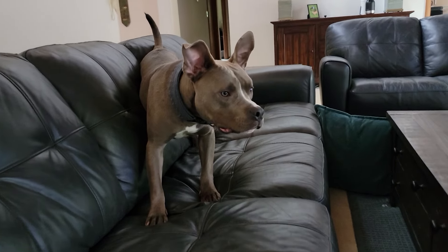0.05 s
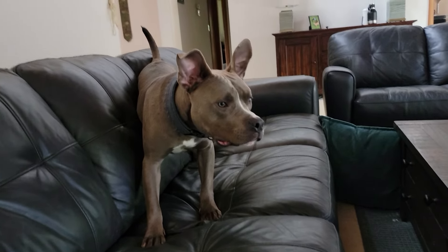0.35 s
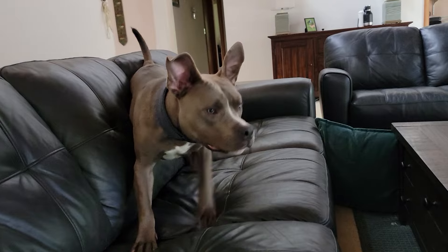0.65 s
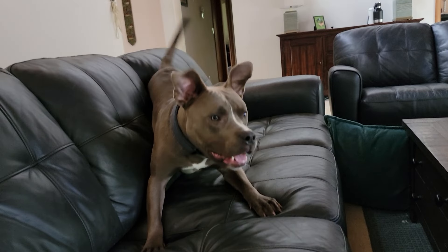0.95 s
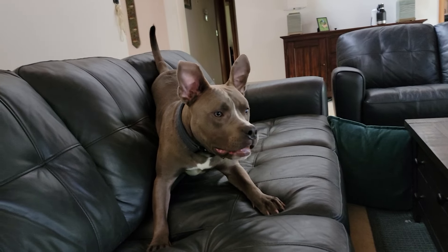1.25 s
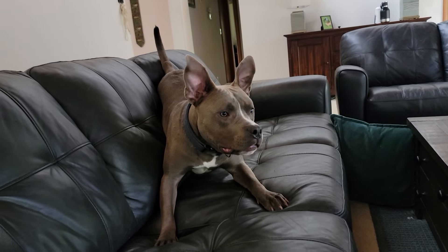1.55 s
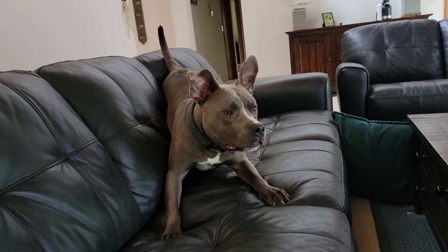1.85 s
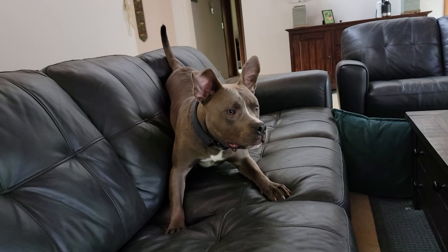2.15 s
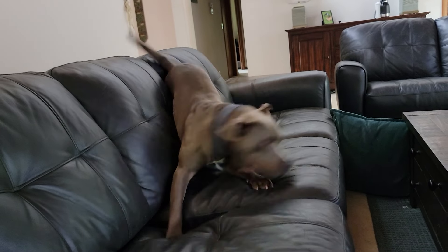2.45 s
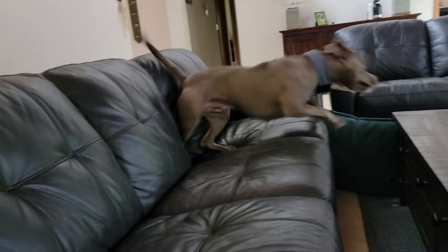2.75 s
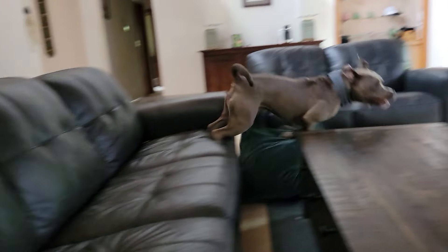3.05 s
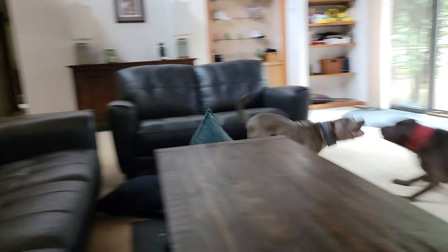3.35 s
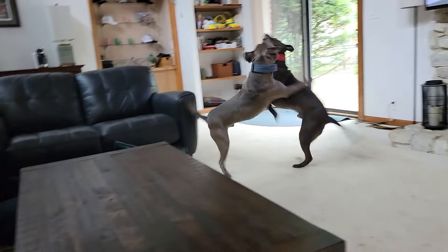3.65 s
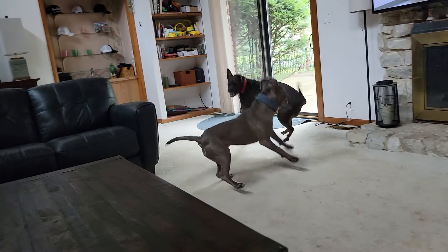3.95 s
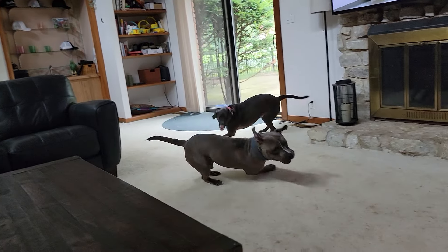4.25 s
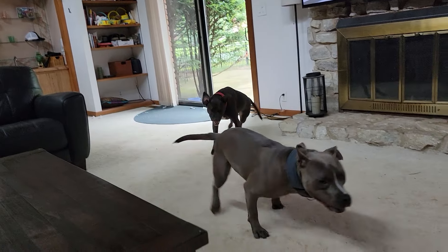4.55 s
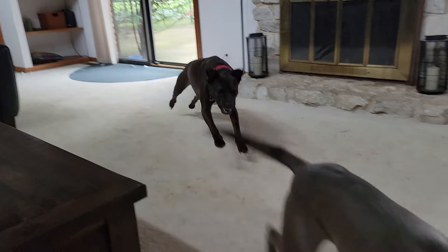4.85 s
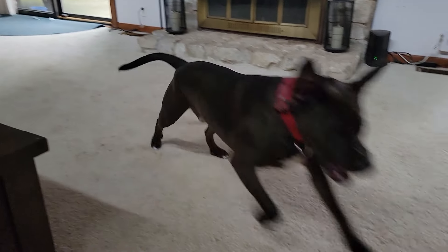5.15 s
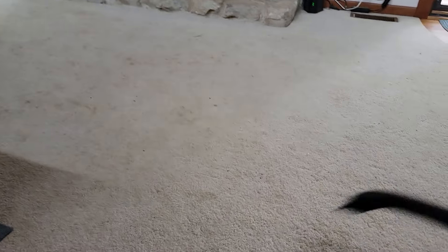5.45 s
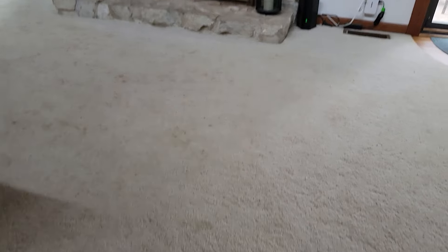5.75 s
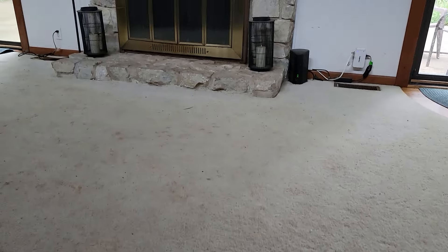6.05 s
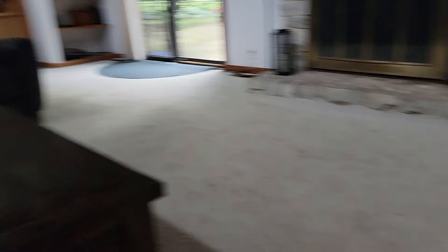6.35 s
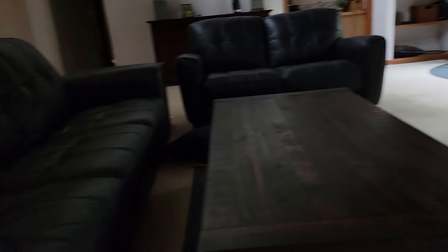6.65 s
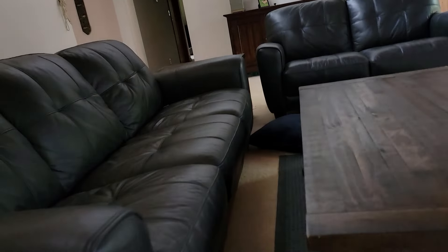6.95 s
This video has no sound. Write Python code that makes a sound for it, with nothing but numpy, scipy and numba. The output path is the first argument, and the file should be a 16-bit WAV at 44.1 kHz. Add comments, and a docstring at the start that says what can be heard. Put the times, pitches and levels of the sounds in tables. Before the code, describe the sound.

Paws thump on a leather sofa, then loud, rough barks and growls break out as two dogs tussle and run across carpet.

```python
"""Rough barks, growls and thudding paws: two dogs play-fight in a carpeted living room.
One thumps a leather sofa, then leaps off with a bark; they tussle, one yelps, and they run past.
Each call is vocal-fold pulses and breath ringing jaw, tongue and throat. Paws set floor and cushions
swinging, leather and carpet rustle, claws click and a collar chinks. The room rings briefly over a
low hum, all heard through a phone with a microphone at each end."""
import sys
import numpy as np
from scipy import signal
from scipy.fft import rfft, irfft
from scipy.io import wavfile
from scipy.ndimage import uniform_filter1d, minimum_filter1d
from numba import njit

SR = 44100
rng = np.random.default_rng(int(sys.argv[2]) if len(sys.argv) > 2 else 0)


def wrap_up_sound(samples):
    """Save the sound to the file named by the first command line argument, as 16-bit audio."""
    columns = np.atleast_2d(samples).T
    # keep every value between -1 and 1, then stretch to whole-number steps
    tamed = np.clip(columns, -1, 1)
    steps = np.round(tamed * 32767).astype(np.int16)
    wavfile.write(sys.argv[1], SR, steps)


N = 308700
TIME = np.arange(N) / SR


def undb(db):
    """Decibels to gain."""
    return 10 ** (np.asarray(db) / 20)


def unit(x):
    """Scale to rms 1."""
    return x / np.sqrt(np.mean(x ** 2) + 1e-20)


def add(out, s, x):
    """Mix x into out from time s."""
    i = int(s * SR)
    out[..., i:i + x.shape[-1]] += x[..., :N - i]


def on_log_axis(points, hz):
    """Read (Hz, value) points at any frequency."""
    f, value = np.transpose(points)
    return np.interp(np.log(hz + 1), np.log(f), value)


def colour(x, points):
    """Equalise by a curve of (Hz, dB) points."""
    n = x.shape[-1]
    return irfft(rfft(x) * undb(on_log_axis(points, np.arange(n // 2 + 1) * SR / n)), n)


@njit
def svf(x, hz, width):
    """State-variable filter with moving centre: band-pass and low-pass."""
    band, low, b, l = np.empty(len(x)), np.empty(len(x)), 0., 0.
    for i in range(len(x)):
        g, k = np.tan(np.pi * hz[i] / SR), width[i] / hz[i]
        v = (b + g * (x[i] - l)) / (1 + g * (g + k))
        band[i], low[i] = k * v, l + g * v
        b, l = 2 * v - b, 2 * low[i] - l
    return band, low


def resonate(x, hz, width):
    """One resonance, gain 1 at its centre."""
    return svf(x, hz + 0 * x, width + 0 * x)[0]


def steep(x, hz, width):
    """A resonance with steep skirts."""
    return resonate(resonate(x, hz, width), hz, 2 * width)


def lowpass(x, hz):
    """Flat two-pole low-pass whose corner can move."""
    return svf(x, hz + 0 * x, np.sqrt(2) * hz + 0 * x)[1]


def butterworth(x, kind, hz, order):
    """Steady high-pass or low-pass."""
    return signal.sosfilt(signal.butter(order, hz, kind, fs=SR, output="sos"), x)


def walk(n, rate):
    """Random drift with spread near 1 and about rate turns a second."""
    knots = rng.standard_normal(8192)
    return np.interp(np.arange(n) * rate / SR, np.arange(8192), knots) * np.sqrt(3 / 2)


def diffuse(n, mic_gap_m=.15):
    """Noise from all sides at the two microphones: alike in the bass, unrelated in the treble."""
    likeness = np.sinc(2 * np.arange(n // 2 + 1) * SR / n * mic_gap_m / 343)
    mid, side = rfft(rng.standard_normal((2, n))) * np.sqrt([1 + likeness, 1 - likeness])
    return irfft(np.array([mid + side, mid - side]), n) / np.sqrt(2)


def room(x, build_s=0.0072):
    """Reverb that builds over the first reflections, each octave dying at its own rate."""
    # The room's decay. Each row: frequency in Hz, seconds to fall 60 dB.
    decay_times = [(100, 0.38), (550, 0.74), (1200, 0.63), (15000, 0.59)]
    t = TIME[:SR * 4 // 5]
    field = rfft(diffuse(len(t)))
    octave = np.log2(np.maximum(np.arange(len(t) // 2 + 1) * SR / len(t), 64) / 64)
    tail = 0
    for k in range(10):
        t60 = on_log_axis(decay_times, 64 * 2 ** k)
        fade = undb(-60 * t / t60) * (1 - np.exp(-(t / build_s) ** 2))
        band = irfft(field * np.maximum(1 - abs(octave - k), 0), len(t))
        tail = tail + band * fade / np.linalg.norm(fade)
    return signal.fftconvolve(x[None], tail, axes=1)[:, :N]


def house_hum(level_db=-62, waver_db=1.0):
    """The low hum of the house: a bed of dark, gently wavering noise."""
    # The hum's tone. Each row: frequency in Hz, gain in dB.
    spectrum = [(20, -27), (79, -12), (150, -21.5), (172, -27), (228, -23.5), (357, -39.5), (1150, -44.5),
                (1710, -61.5), (3530, -43.5), (16000, -104)]
    return unit(colour(diffuse(N), spectrum)) * undb(level_db + waver_db * walk(N, 4.2))


def scratches(per_s=35, scatter_db=5, grain_s=0.0052, centre_hz=8000, level_db=-11):
    """Claws catch in leather and carpet pile: sparse crisp ticks of uneven size."""
    catches = (rng.random(N) < per_s / SR) * undb(scatter_db * rng.standard_normal(N))
    grains = signal.lfilter([1], [1, -np.exp(-1 / (grain_s * SR))], catches)
    ticks = np.array([resonate(mic * grains, centre_hz, centre_hz) for mic in diffuse(N)])
    return undb(level_db) * unit(ticks)


def scuffle(rise_s=0.086, settle_s=0.085, fidget_db=-80, rustle_db=1, grain_db=1.5, slip_db=2.0,
            patter_db=2.5, pan_db=-2):
    """Leather and carpet rustle in little slips as the dogs' weight rumbles through sofa and floor."""
    # Bouts of pouncing, wrestling and running.
    # Each row: start in seconds, length in seconds, rustle in dB, rumble in dB.
    bouts = [(0.716, 0.034, -39.5, -34), (2.378, 0.36, -44, -41), (2.818, 0.15, -48, -38.5),
             (3.009, 0.019, -41.5, -32.5), (3.322, 0.098, -42.5, -31), (3.45, 0.63, -38.5, -41.5),
             (4.267, 0.53, -49, -46), (4.889, 0.46, -52.5, -38), (5.252, 0.59, -46, -34.5),
             (6.02, 0.14, -45.5, -34), (6.348, 0.43, -59.5, -46.5)]
    # The tone of the rustle and of the rumble. Each row: frequency in Hz, gain in dB.
    rustle_eq = [(300, -1), (900, 18), (2500, 11), (4200, 5.5), (7300, 5.5), (8300, -5.5), (16000, 1)]
    rumble_eq = [(20, -20), (65, 3.5), (150, -1), (330, -10), (2000, -39)]
    rubbing, weight = np.full(N, undb(fidget_db)), np.zeros(N)
    for s, length, rub_db, weight_db in bouts:
        rise = np.clip(1 + (TIME - s) / rise_s, 0, 1) ** 2
        effort = rise * np.exp(-np.maximum(TIME - s - length, 0) / settle_s)
        rubbing = np.maximum(rubbing, undb(rub_db) * effort)
        weight = np.maximum(weight, undb(weight_db) * effort)
    slips = unit(undb(grain_db * walk(N, 500) + slip_db * walk(N, 35)))
    mic_gains = undb(rustle_db + np.array([[pan_db], [-pan_db]]) / 2)
    rustle = unit(colour(diffuse(N) * slips, rustle_eq)) * mic_gains
    rumble = unit(colour(diffuse(N) * undb(patter_db * walk(N, 30)), rumble_eq))
    return (rustle + scratches()) * rubbing + rumble * weight


def swishes(flutter_db=3, room_db=-4):
    """Snorts, sliding paws and two collar jingles: short fluttering swells of hiss."""
    # Each row: crest in seconds, half length in seconds, level in dB, centre in Hz, width in Hz.
    swells = [(0.774, 0.05, -47, 200, 1200), (2.375, 0.014, -31.5, 663, 700),
              (0.743, .035, -48, 14260, 5400), (2.723, 0.029, -47, 11020, 9936),
              (3.047, 0.022, -36.5, 4722, 4860), (3.013, 0.022, -39, 375, 277.8),
              (4.52, 0.021, -44.5, 2800, 1389), (4.921, 0.052, -46.5, 1306, 2650),
              (6.16, 0.16, -45, 1170, 2800), (6.398, 0.047, -49, 3860, 2160),
              (6.74, 0.035, -46.5, 4150, 648)]
    out = np.zeros(N)
    for s, half, db, hz, width in swells:
        t = np.arange(-2 * half, 2 * half, 1 / SR)
        hiss = unit(steep(rng.standard_normal(N)[:len(t)], hz, width))
        add(out, s + t[0], hiss * np.exp(-(t / half) ** 2) * undb(db + flutter_db * walk(len(t), 216.2)))
    return out + undb(room_db) * room(out)


def collar(ring_t60=0.057, ring_width_hz=420, ring_db=-4, crack_db=-2, crack_s=0.0031, crack_hz=4800,
           room_db=-9):
    """A collar ring chatters on its buckle: a sharp crack and damped metal modes, never twice alike."""
    # The metal ring's modes. Each row: frequency in Hz, gain in dB.
    modes = [(4210, 8), (6400, -0.5), (9040, -12), (10300, -21)]
    # Its chinks. Each row: start in seconds, strength in dB.
    chinks = [(4.316, -34.5), (4.691, -31.5), (4.742, -39), (4.991, -31.5), (5.159, -35), (6.37, -37.5),
              (6.697, -43), (6.718, -37.5)]
    rings, cracks, t = np.zeros(N), np.zeros(N), TIME[:SR // 4]
    for s, db in chinks:
        chatter = rng.standard_normal(2 * len(t))
        scatter_db = 2 * rng.standard_normal(len(modes))
        metal = sum(undb(gain + scatter) * steep(chatter, hz, ring_width_hz)
                    for (hz, gain), scatter in zip(modes, scatter_db))
        ring = unit(metal)[len(t):]  # already ringing at full strength
        crack = unit(resonate(chatter[:len(t)], crack_hz, 2 * crack_hz))
        add(rings, s, undb(db + ring_db) * ring * undb(-60 * t / ring_t60))
        add(cracks, s, undb(db + crack_db) * crack * np.exp(-t / crack_s))
    return rings + cracks + undb(room_db) * room(rings)


def clicks(crack_db=-1, crack_s=0.0048, trim_db=-7, room_db=-19):
    """Claws and teeth make small hard contacts close by: a broad crack and one short resonance."""
    # Each row: start in seconds, level in dB before the trim, ring in Hz, seconds to fall 60 dB.
    contacts = [(0.102, -46, 1100, 0.016), (0.103, -31, 380, 0.043), (0.661, -40, 3740, 0.072),
                (0.727, -23, 1270, 0.023), (0.9983, -22, 4570, 0.0039), (0.9984, -30.5, 900, 0.0062),
                (3.45, -24.5, 6100, 0.063), (3.587, -23, 11500, 0.027), (4.094, -26.5, 5950, 0.023),
                (4.924, -30.5, 1070, 0.062), (5.225, -26.5, 6560, 0.0055)]
    out, t = np.zeros(N), TIME[:SR // 3]
    for s, db, hz, t60 in contacts:
        noise = rng.standard_normal(len(t))
        crack = undb(crack_db) * unit(resonate(noise, hz, 2 * hz)) * np.exp(-t / crack_s)
        ring = unit(resonate(noise, hz, hz / 10))
        add(out, s, undb(db + trim_db) * (ring + crack) * undb(-60 * t / t60))
    return out + undb(room_db) * room(out)


def thumps(contact_s=0.0035, ring_cycles=17, thud_db=-5, sag=0.11, room_db=-7):
    """A soft paw sets floor or cushion swinging, lower as the load eases, with a dull thud on top; one short
    low growl is made the same way."""
    # Paw landings and knocks, and at 4.2 s a short low growl. Each row: start in seconds, level in dB, ring in
    # Hz.
    landings = [(0.694, -33.5, 99), (0.755, -24.5, 152), (0.804, -25.5, 114), (2.347, -22.5, 105),
                (2.722, -22, 118), (2.997, -20.5, 268), (3.026, -28, 135), (3.254, -28.5, 96.5),
                (3.288, -28, 182), (4.023, -20, 100), (4.205, -18.5, 244), (4.674, -29, 78),
                (4.972, -28.5, 76), (5.171, -31.5, 98), (5.646, -11.5, 122), (5.916, -17, 103),
                (6.014, -24, 141), (6.486, -34, 112), (6.614, -35, 280), (6.911, -36, 100),
                (6.956, -33.5, 100)]
    out, t = np.zeros(N), TIME[:SR // 2]
    for s, db, hz in landings:
        thud = unit(lowpass(resonate(rng.standard_normal(len(t)), hz, 2 * hz), 5 * hz))
        attack = 1 - np.exp(-t / contact_s)
        fade = undb(-60 * t * hz / ring_cycles)
        swing = np.sin(2 * np.pi * np.cumsum(hz * (1 + sag * (2 * fade - 1))) / SR)
        add(out, s, undb(db) * attack * fade * (swing + undb(thud_db) * thud))
    out = butterworth(out, "high", 62, order=3)
    return out + undb(room_db) * room(out)


def voice(pitch, db, rough, jaw_hz, corner_hz, hiss_db, tongue_hz, whistle_hz, nose_db=-60,
          jitter=.06, shimmer_db=3, flutter_db=2.0, throat_db=2, tongue_db=-4, spray_db=-10):
    """Uneven vocal-fold pulses and breath ring jaw, tongue, throat and nose; air whistles past teeth."""
    # Resonances of the throat and of the teeth. Each row: centre in Hz, width in Hz, gain in dB.
    throat = [(1200, 28, -23), (1310, 344, -2.5), (1430, 154, -12), (1754, 110, -0.5), (2120, 284, -7.5)]
    teeth = [(6660, 1500, 9), (6980, 2000, 6.4)]
    n, rough = len(pitch), np.clip(rough, 0, 1)
    cycles = np.cumsum(pitch * (1 + jitter * rough * walk(n, 260))) / SR
    pulses = unit(np.diff(np.floor(cycles), prepend=0) * undb(shimmer_db * rough * walk(n, 254.5)))
    air = unit(np.exp(-(cycles % 1) / 2.0) * rng.standard_normal(SR)[:n])  # one puff a cycle
    flutter = undb(flutter_db * rough * walk(n, 220))  # lips and folds flap
    folds = pulses * np.sqrt(1 - rough)
    low_drive = (folds + 1.5 * rough * air) * flutter
    high_rough = np.sqrt(rough) * (1 + rough) / 2  # the upper partials break up first
    high_drive = (np.sqrt(np.maximum(1 - high_rough, 0)) * pulses + np.sqrt(high_rough) * air) * flutter

    upper = sum(undb(gain) * steep(high_drive, hz, width) for hz, width, gain in throat)
    upper += undb(tongue_db) * steep(high_drive, tongue_hz, width=220)
    upper = lowpass(lowpass(upper, corner_hz), corner_hz)  # a closing mouth muffles the throat
    upper = butterworth(upper, "low", 2900, order=8)
    chest = undb(-32 - 0.85 * db) * steep(folds, pitch, width=100)  # the fundamental shows in soft calls
    nose = undb(nose_db) * steep(high_drive, hz=2090, width=640)
    jaw = steep(low_drive, jaw_hz, width=180 * (1 + rough))
    tone = jaw + undb(throat_db) * upper + chest + nose
    tone = tone / np.sqrt(uniform_filter1d(tone ** 2, size=1100) + 1e-12)  # levelled over 25 ms

    hiss = unit(sum(undb(gain) * steep(high_drive, hz, width) for hz, width, gain in teeth))
    hiss = butterworth(hiss, "high", 5000, order=4)
    whistle = unit(steep(air, whistle_hz * (1 + .04 * walk(n, 35)), width=270))
    spray = undb(spray_db) * unit(steep(air, hz=13000, width=6700))
    breath = (hiss + whistle) / np.sqrt(2) + spray
    return (tone + undb(hiss_db) * breath) * undb(db) * signal.windows.tukey(n, .06)


def yelp(quaver=.02):
    """A clean upward leap of pitch that roughens into a quavering whine. Gives start and sound."""
    # The yelp's path. Each row: time in seconds, pitch in Hz, level in dB, roughness from 0 to 1.
    contour = [(5.25, 201, -44, .2), (5.265, 265.7, -26, 0.1), (5.272, 305.7, -16, 0.14),
               (5.288, 350, -16, 0.06), (5.301, 395.3, -24, 0.25), (5.334, 427.8, -26.5, 0.35),
               (5.357, 378.2, -20.5, 0.2), (5.448, 354.8, -27.5, 0.17)]
    s, *columns = np.transpose(contour)
    pitch, db, rough = (np.interp(np.arange(s[0], s[-1], 1 / SR), s, c) for c in columns)
    pitch = pitch * (1 + quaver * walk(len(pitch), 40))
    return s[0], voice(pitch, db, rough, jaw_hz=591, corner_hz=1175, hiss_db=-39.5, tongue_hz=792,
                       whistle_hz=6900, nose_db=-13.5)


def bark(s, hold_s, db, pitch_hz, rough, jaw_hz, corner_hz, hiss_db, tongue_hz, whistle_hz,
         attack_s=.03, release_s=0.021, shut_db=-16.5, tire_db=-3.5, dull_octaves=0.67):
    """The mouth opens, holds while the push tires, and shuts. Gives start and sound."""
    t = np.arange(-attack_s, hold_s + release_s, 1 / SR)
    shut = np.interp(t, [-attack_s, 0, hold_s, hold_s + release_s], [1, 0, 0, 1])
    tired = np.clip(t / hold_s, 0, 1) - .5
    level = db + tire_db * tired + shut_db * shut ** 2
    pitch = pitch_hz * (1 - .03 * tired - .06 * shut)
    mouth = 1 - 0.18 * shut  # resonances sink as the mouth shuts
    corner = corner_hz / 2 ** (dull_octaves * shut)
    sound = voice(pitch, level, rough, jaw_hz * mouth, corner, hiss_db, tongue_hz * mouth,
                  whistle_hz * mouth)
    return s - attack_s, sound


def dog_calls(standing_db=2, standing_width_hz=7):
    """Each call reaches the microphones a little apart and rings the room and its standing waves."""
    # Barks and growls. Each row: time of full voice in seconds, hold in seconds, level in dB,
    # pitch in Hz, roughness from 0 to 1, jaw resonance in Hz, mouth brightness corner in Hz,
    # hiss between the teeth in dB, tongue resonance in Hz, whistle of the teeth in Hz.
    barks = [(2.418, .026, -9, 274.5, 0.16, 568, 2580, -27.5, 1953, 6240),
             (2.458, 0.043, -14, 285.9, 0.61, 634, 2430, -21.5, 1370, 6570),
             (2.494, 0.033, -12.5, 281.8, 0.22, 570, 1980, -17, 1190, 6430),
             (3.397, .015, -32.5, 203.6, 0.65, 610, 800, -16, 780, 6840),
             (3.431, 0.048, -21, 217.6, 0.73, 667, 1150, -20.5, 1134, 7000),
             (3.504, 0.065, -13, 263.4, 0.53, 760, 1570, -21, 1227, 7750),
             (3.591, 0.07, -21.5, 260.8, 0.7, 742, 1266, -19, 1030, 6020),
             (3.742, 0.08, -18, 295.2, 0.8, 746, 2420, -19.5, 1346, 5600),
             (3.883, 0.2, -28, 181.1, 0.37, 560, 1080, -17, 783, 6340),
             (4.115, 0.042, -27.5, 180.2, 0.37, 586, 1070, -31, 1480, 6130),
             (4.538, 0.011, -32.5, 274.2, 0.14, 540, 1120, -15, 866, 6000),
             (5.49, 0.077, -20, 259.5, 0.41, 544, 1510, -33, 1070, 6940),
             (5.554, 0.041, -8.5, 259.5, 0.41, 763, 3020, -31.5, 1133, 6630),
             (5.623, 0.028, -19.5, 254.9, 0.64, 608, 2126, -20.5, 1065, 6200),
             (5.994, 0.15, -37, 174.8, 0.57, 473, 660, -17, 600, 7050)]
    # Where the calling dog is. Each row: time in seconds, reverb send in dB,
    # lead of the left microphone in milliseconds (negative when the dog is on the right).
    places = [(2.5, -2.5, -0.44), (3.499, 0, -0.12), (3.8, -0.5, -0.17), (4.499, -2, 0), (5.28, -4, -.34),
              (5.597, -3.5, -0.3)]
    # The room's standing waves, in Hz.
    standing_hz = [1108, 1133, 1170, 1550]
    direct, send = np.zeros((2, N)), np.zeros(N)
    s, *columns = np.transpose(places)
    for start, sound in [bark(*row) for row in barks] + [yelp()]:
        room_db, lead_ms = (np.interp(start, s, c) for c in columns)
        add(direct[0], start, sound)
        add(direct[1], start + lead_ms / 1000, sound)
        add(send, start, sound * undb(room_db))
    reverb = room(send)
    standing = np.array([sum(resonate(mic, hz, standing_width_hz) for hz in standing_hz)
                         for mic in reverb])
    return direct + reverb + undb(standing_db) * standing


def scene():
    """The dogs over the low hum of the house."""
    return dog_calls() + thumps() + clicks() + collar() + swishes() + scuffle() + house_hum()


def record(dry, ceiling=1.0, top_hz=16100):
    """The left microphone is weaker and duller; a limiter ducks any overs and the phone cuts the top."""
    mics = np.array([colour(dry[0], [(700, -1.5), (3000, -4.5)]), dry[1]])
    ducking = ceiling / np.maximum(abs(mics).max(axis=0), ceiling)
    gain = uniform_filter1d(minimum_filter1d(ducking, size=300), size=300)
    return signal.sosfilt(signal.ellip(8, .2, 70, top_hz, fs=SR, output="sos"), mics * gain)


dry = scene()
out = record(dry)
wrap_up_sound(out)
```